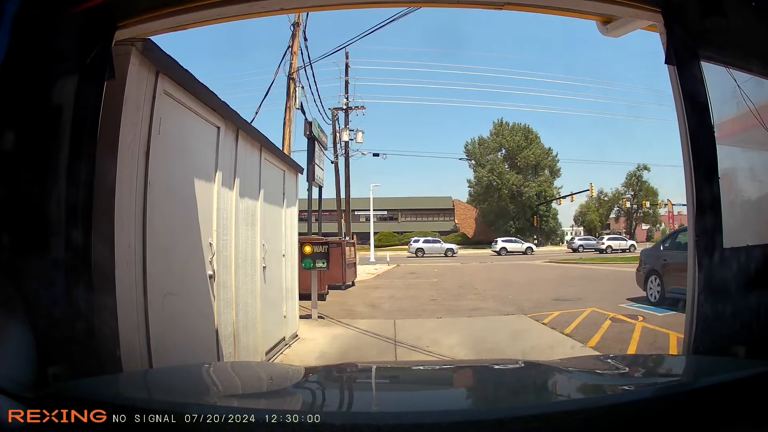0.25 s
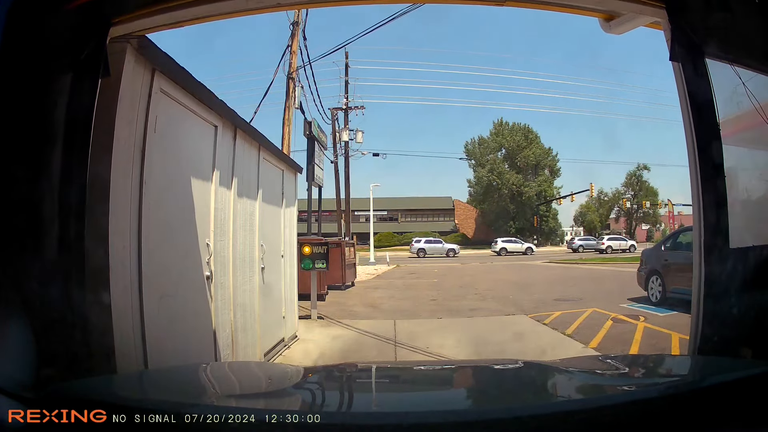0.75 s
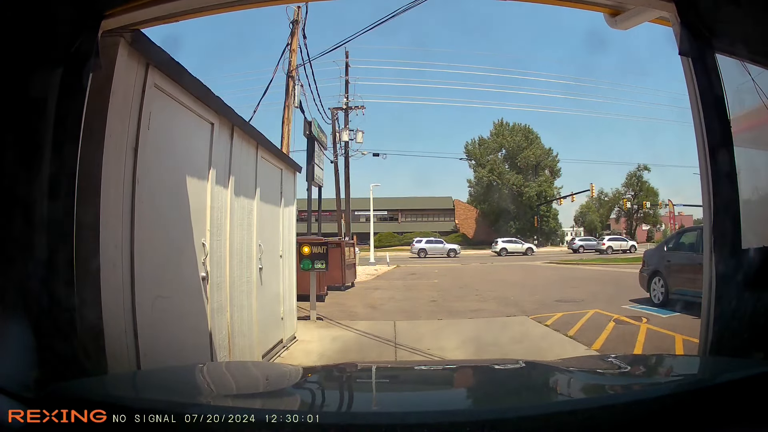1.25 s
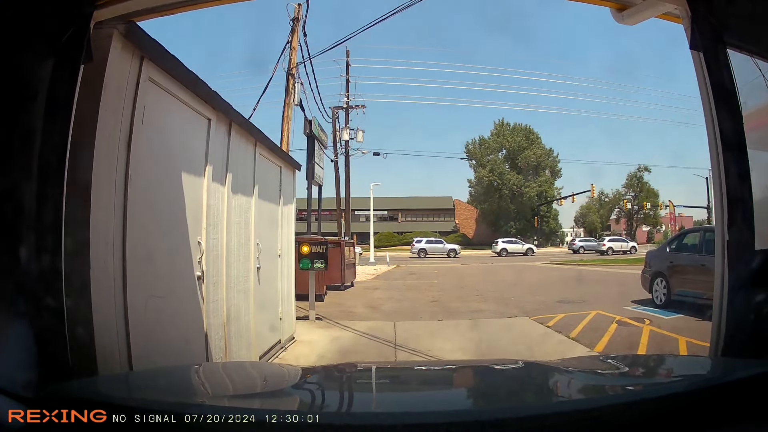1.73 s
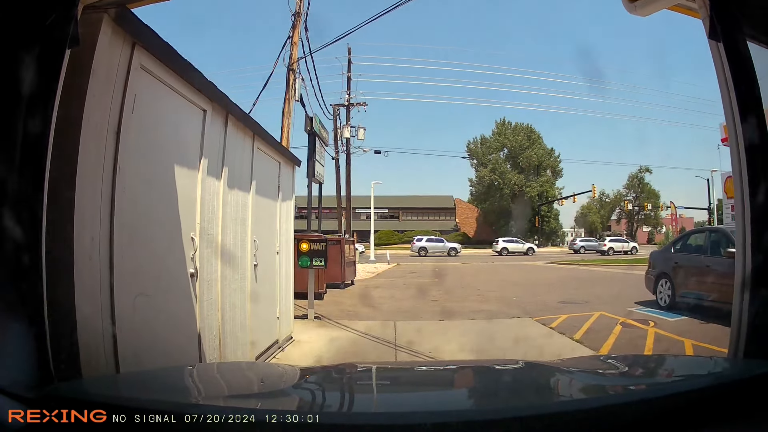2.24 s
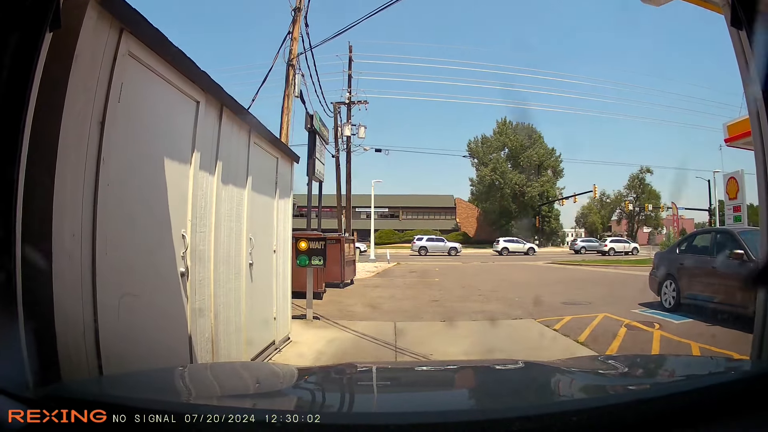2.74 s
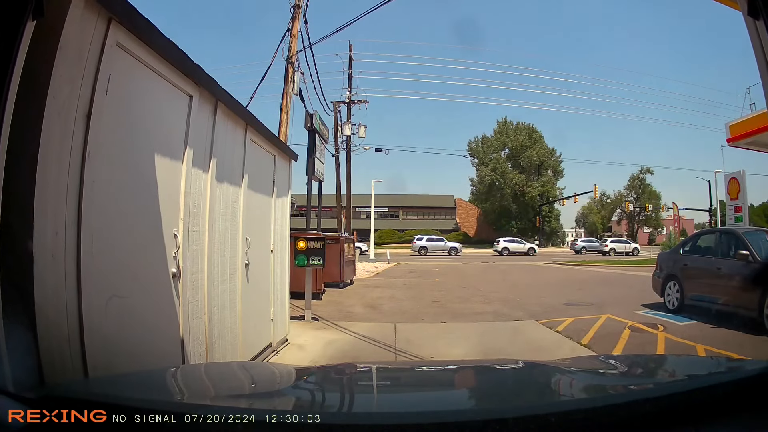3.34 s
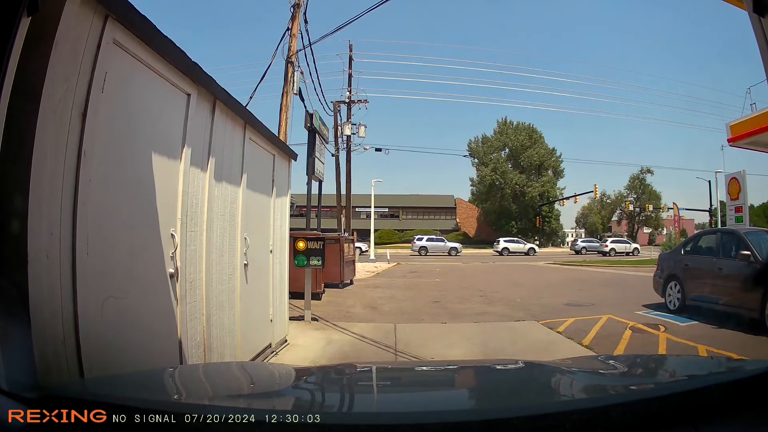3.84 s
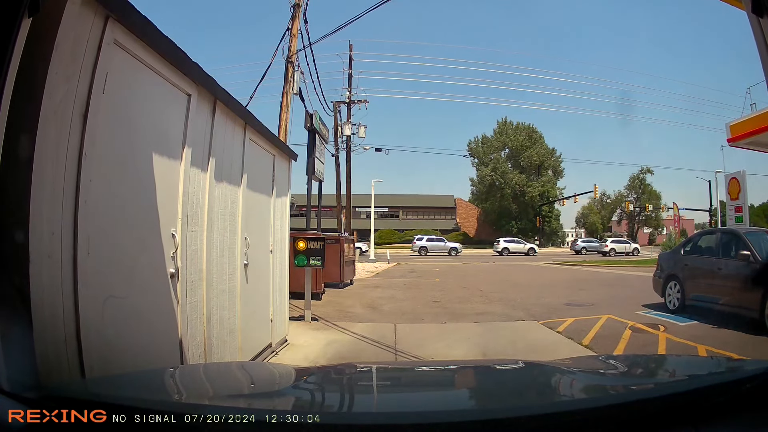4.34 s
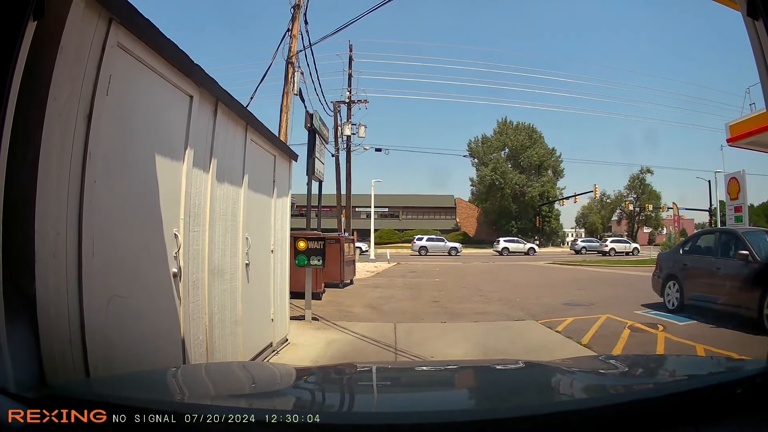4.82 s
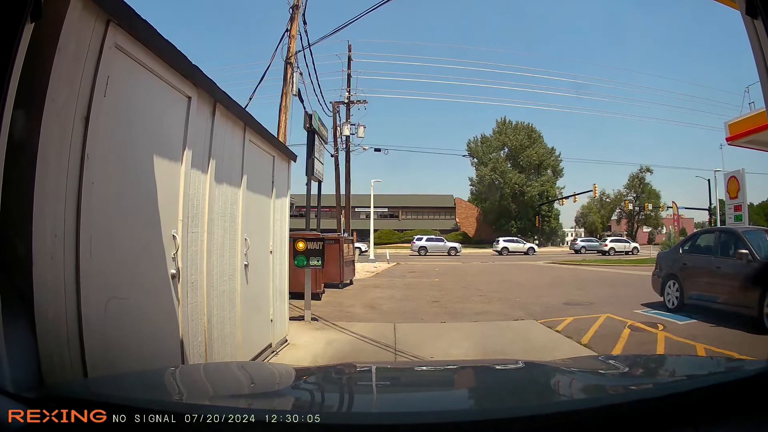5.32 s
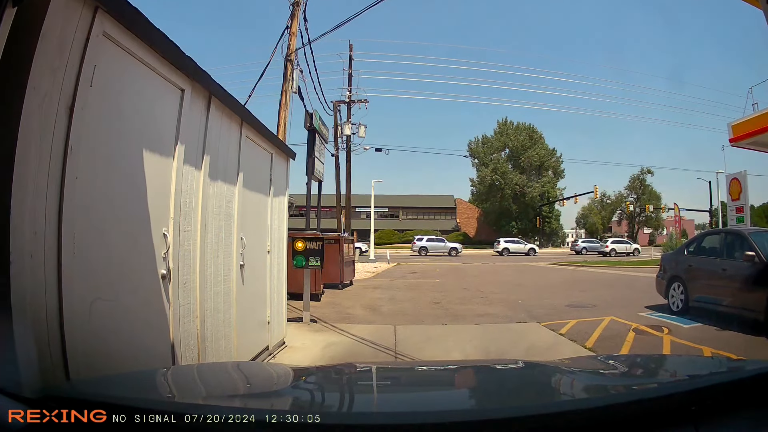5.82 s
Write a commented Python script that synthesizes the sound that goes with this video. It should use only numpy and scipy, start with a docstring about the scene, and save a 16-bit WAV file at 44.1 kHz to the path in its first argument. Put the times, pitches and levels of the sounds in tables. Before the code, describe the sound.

A car rolls slowly out of a car wash under loud air dryers. Inside the closed cabin, a dense low roar and broad hiss fill everything, with irregular thuds of wind. Faint howls come early, brief swishes and droplets near the middle, then a soft sizzle of spray. The buffeting and hiss ease slightly as the roof keeps humming and booming.

```python
"""Under the blowers of a car wash

A car creeps out under the dryer blowers, heard from a small two-port microphone behind the windscreen.
Shaped noise makes the buffeting of the glass, the boom of the cabin, and a roar whose hiss slowly dulls.
A noise band of wandering pitch makes the drone; the fans add a sine whine and narrow noise bands.
Faint howls, brief swishes and sizzling spray are noise that swells and fades; spurts are ringing clicks."""
import sys
import numpy as np
from scipy import signal
from scipy.fft import rfft, irfft
from scipy.io import wavfile
from scipy.ndimage import uniform_filter1d, minimum_filter1d, map_coordinates

SR = 44100
rng = np.random.default_rng(int(sys.argv[2]) if len(sys.argv) > 2 else 0)


def wav_out(sig):
    """Save sig, one row per channel (or a flat mono array), as 16-bit PCM at SR to the path in sys.argv[1]."""
    wavfile.write(sys.argv[1], SR, np.round(np.clip(np.atleast_2d(sig).T, -1, 1) * 32767).astype(np.int16))


N = 267676
TIME = np.arange(N) / SR
FREQ = np.maximum(np.fft.rfftfreq(N, 1 / SR), 1)  # Hz; at least 1, so that its logarithm exists

# Relative strength of the glass buffeting at each pitch: pitch_hz, level_db
BUFFET_SPECTRUM = [(12, -35.5), (25, -13), (40, -2.5), (60, 2.5), (80, 2.5), (110, 8), (135, 2.5),
                   (170, -18.5), (300, -70)]
# Relative strength of the low and middle rush of air: pitch_hz, level_db
ROAR_SPECTRUM = [(130, -25), (220, 5), (290, -0.05), (370, -0.7), (460, -1.7), (550, -8), (630, -8),
                 (695, -10.5), (780, -9), (860, -11.5), (950, -15.5), (1100, -13.5), (1250, -20),
                 (1800, -25.5), (3500, -72)]
# Relative strength of the high rush of air: pitch_hz, level_db
HISS_SPECTRUM = [(700, -7), (1150, 1), (1380, 2), (1540, 4), (1690, -0.5), (1790, 0), (2100, 0.5),
                 (2300, 0), (2460, 1.1), (2850, -2.04), (4000, -4.5), (5000, -9.5), (6200, -16.5),
                 (8000, -24.5), (11000, -41), (14000, -51)]
# Relative strength of the spray's sizzle: pitch_hz, level_db
SPRAY_SPECTRUM = [(4000, -27), (7000, -2.5), (10000, 1), (11800, 0), (13000, -6), (14500, -17.5)]
# Resonances of the cabin air and the roof: pitch_hz, width_hz, relative level_db
CABIN_RESONANCES = [(126.6, 13, 0), (140, 12, -1), (160, 14.5, -0.5), (178.4, 23, 1.5), (197, 25, -13),
                    (344, 28, -16.5), (376, 11.7, -16)]
# Blade tones of the fans, smeared by moving air, with their harmonics: pitch_hz, width_hz, relative level_db
BLADE_TONES = [(586, 4.2, -0.5), (614, 13, -2), (1177, 4.9, -10.5), (1760, 4, -9.5), (1960, 3.2, -11)]
# Howls of fixed pitch: peak_s, length_s, pitch_hz, width_hz, level_db
HOWL_EVENTS = [(0.098, 0.54, 1156, 140, -39.5), (1.2, 0.92, 380, 3.9, -37.5), (1.257, 0.97, 432, 14, -32.5)]
# Brief swishes: peak_s, length_s, pitch_hz, width_hz, level_db (before the rasp)
SWISH_EVENTS = [(2.78, .09, 5750, 600, -58), (2.832, .025, 4400, 800, -47),
                (2.849, 0.034, 3470, 480, -32.5), (3.047, 0.063, 1450, 1000, -35.5),
                (3.22, 0.095, 1980, 720, -37.5)]
# How alike the two sides sound at each pitch; above about 6.2 kHz the two sides are almost identical: pitch_hz,
# # correlation (no unit, -1 to 1)
SIDE_LIKENESS = [(60, 0.99), (160, 1), (270, 0.91), (480, 0.87), (700, 0.39), (860, 0.68), (1050, .08),
                 (1300, 0.021), (1550, 0.0026), (1900, 0.0079), (2400, -0.55), (3400, -0.47), (4800, -0.69),
                 (6050, -0.63), (6350, 1), (11500, 0.73), (13000, 0.1)]
# Path of the cabin's drone, strongest once the jets are on the roof: time_s, pitch_hz, level_db
DRONE_PATH = [(0, 127.4, -23), (.6, 130, -18), (.75, 140.1, -25), (2.4, 135.1, -32), (2.76, 138.2, -16.5),
              (2.9, 177.9, -22), (3.23, 174, -17.5), (3.319, 152.9, -16), (3.43, 146.6, -17),
              (3.702, 147.5, -23.5), (3.902, 167.3, -13), (4.15, 171.8, -22.5), (4.3, 168, -15.5),
              (4.5, 166.1, -20.5), (4.68, 157.6, -13.5), (5.05, 143.6, -18), (5.219, 152.4, -19.5),
              (5.64, 168.1, -16), (5.801, 159.6, -18), (6.07, 142.9, -11.5)]
# Level of the hiss, falling in small steps, some just after loud booms: time_s, level_db
HISS_PATH = [(0, -33.5), (1.1, -34.5), (1.8, -34.5), (2.15, -34.5), (2.7, -34), (3.2, -35.5), (3.38, -37.4),
             (3.8, -36.5), (3.95, -38), (4.55, -37), (4.72, -38.5), (5.42, -37.5), (5.62, -39), (6.07, -39)]
# Brief changes in level, mostly rises; a negative lift is a dip:
# peak_s, length_s, buffeting_lift_db, boom_lift_db
LIFT_EVENTS = [(0.638, 0.04, 8, 2), (0.862, .05, -3, 4.5), (1.269, 0.048, 8, -2), (1.465, .035, 5, 4.5),
               (1.67, 0.063, 5.5, 1.5), (1.821, 0.034, 1, 7.5), (2.243, 0.12, 5, 2.5), (2.51, 0.06, 8, -4),
               (2.64, 0.051, 6, 1.5), (2.766, 0.0092, 11, 4), (2.904, 0.02, 4, 9), (3.13, 0.092, 4, 0),
               (3.221, 0.025, 5, 2), (3.917, 0.14, 2, 3), (4.114, 0.071, 6, -5.5), (4.412, 0.019, -3, 8.5),
               (4.482, 0.029, 10, -3), (4.65, 0.15, 4.5, 0), (5.565, 0.04, -1, 8.5), (5.74, 0.041, 11, -8),
               (5.988, 0.077, 8, 2.5)]
# Brief changes in level, mostly dips; a negative depth is a rise:
# middle_s, buffeting_depth_db, cabin_depth_db
DIP_EVENTS = [(.71, 2, 14), (1.04, 3, 8), (1.53, 3, 5), (1.9, 2, 10), (3.31, 5, 4), (4.811, 6, 3.5),
              (5.239, 4, 5.5), (5.44, -2, 9), (5.75, 0, 5)]
# Showers of spray blown off the roof: peak_s, length_s, level_db (before the patter)
SHOWER_EVENTS = [(3.75, 0.74, -62), (5.151, 0.52, -68)]
# Whine of the clearest fan as the car rolls on: time_s, level_db
WHINE_PATH = [(0, -32.5), (.38, -40.5), (.7, -32.7), (1.25, -41), (1.5, -40), (2.15, -42), (2.45, -37.5),
              (3.5, -40.5), (4.5, -38.5), (4.9, -45), (5.28, -46), (5.53, -36), (5.8, -46), (6.07, -46.5)]
# Spurts of water shaken off the top of the windscreen:
# peak_s, length_s, pitch_ratio (multiplies the ring's pitches), level_db
SPURT_EVENTS = [(3.003, .012, 1.1, -52), (3.028, .017, 1.03, -49.5), (3.06, .03, 1.01, -50),
                (3.103, .008, 0.83, -53), (3.194, .026, 1.13, -48), (3.244, .012, 1.1, -52),
                (3.22, 0.16, 1, -55)]
# What the drops of a spurt ring with: pitch_hz, width_hz, relative level_db
DROP_RESONANCES = [(6400, 1300, -9), (8670, 260, 2), (9940, 470, -3), (10600, 1500, -11)]

# buffeting: level at the start, and its fall as the car rolls on
BUFFET_DB, BUFFET_FALL_DB_PER_S = -17, 1.82
# boom: level with the jets on the glass, then on the roof, which the wide jets reach gradually
BOOM_GLASS_DB, BOOM_ROOF_DB, ROOF_S, ROOF_LENGTH_S = -20, -17, 1.7, 0.9
DRONE_WIDTH_HZ = 8.6
# roar: level at the start and fall with distance, plus a swell while the nozzles are nearest
ROAR_DB, ROAR_FALL_DB_PER_S = -23, 0.37
NEAREST_S, NEAREST_LENGTH_S, ROAR_LIFT_DB = 2.6, 0.91, 2
DIP_S = 0.027
# thinning mist on the glass: level at the start and its fall
MIST_DB, MIST_FALL_DB_PER_S = -57, 2
# clearest fan: middle pitch and typical drift; level of the smeared blade tones against its whine
WHINE_HZ, WHINE_DRIFT_HZ, BLADES_DB = 590, 2.48, -0.5
DROPS_PER_S, DROP_SPREAD_DB = 650, 0.5
TOP_HZ = 13300  # little sounds above this pitch


def undb(db):
    """Turn decibels into a gain that multiplies the sound."""
    return 10 ** (np.asarray(db) / 20)


def over_frequency(points):
    """Join points by straight lines on a log-frequency axis."""
    hz, value = np.transpose(points)
    return np.interp(np.log(FREQ), np.log(hz), value)


def over_time(points):
    """Join points by straight lines along time."""
    return np.interp(TIME, *np.transpose(points))


def resonances(modes):
    """Gain of steep-sided resonances side by side, with their powers added."""
    power = 0
    for hz, width, db in modes:
        offset = (FREQ - hz) / width * 2
        power = power + (undb(db) / (1 + offset ** 2 / 2)) ** 2
    return np.sqrt(power)


def walk(rate):
    """Smooth random curve that changes about rate times a second; its typical spread is 1."""
    curve = irfft(rfft(rng.standard_normal(N)) * np.exp(-(FREQ / rate) ** 2), N)
    return curve / curve.std()


def turbulence(gain):
    """Noise shaped by a gain over frequency, on two sides as alike as the likeness table says; average (rms)
    level 1."""
    alike = np.clip(over_frequency(SIDE_LIKENESS), -1, 1)
    # a shared part and an opposite part, mixed to make the two sides as alike as the table says
    mid, side = rfft(rng.standard_normal((2, N))) * gain * np.sqrt([1 + alike, 1 - alike])
    noise = irfft(np.array([mid + side, mid - side]), N)
    return noise / noise.std()


def driven(noise, db, span_s):
    """Give a noise the level db, leaving only its flutter faster than about span_s."""
    size = int(span_s * SR)
    power = np.mean(noise ** 2, axis=0)
    smooth_power = uniform_filter1d(uniform_filter1d(power, size), size)
    return noise / np.sqrt(smooth_power) * undb(db)


def swell(at, length):
    """A smooth rise to 1 at a given time, and back to 0."""
    return np.exp(-2 * ((TIME - at) / length) ** 2)


def passed(at, length):
    """A smooth step from 0 to 1 around a given time."""
    return .5 + .5 * np.tanh((TIME - at) / length)


def swelling_bands(events):
    """Bands of noise, each swelling and fading around its own pitch."""
    bands = 0
    for at, length, hz, width, db in events:
        noise = turbulence(resonances([(hz, width, 0)]))
        bands = bands + undb(db) * swell(at, length) * noise
    return bands


def bent(sound, ratio):
    """Bend pitch by reading the sound faster or slower; ratio is the reading speed."""
    place = np.cumsum(ratio)
    return np.array([map_coordinates(side, [place], mode="mirror") for side in sound])


def brief_lifts():
    """Brief rises, and some dips, in the level of the buffeting and the boom, in dB; one row for each."""
    return sum(np.outer([glass_db, roof_db], swell(at, length))
               for at, length, glass_db, roof_db in LIFT_EVENTS)


def brief_dips():
    """Brief dips as dB to take off the buffeting and the cabin sound; one row for each."""
    return sum(np.outer([glass_db, cabin_db], swell(at, DIP_S))
               for at, glass_db, cabin_db in DIP_EVENTS)


def buffeting(change_db, lump_db=1.8):
    """Large eddies beat on the windscreen in uneven lumps, less as the jets move up and away."""
    db = BUFFET_DB - BUFFET_FALL_DB_PER_S * TIME + change_db + lump_db * walk(25)
    noise = turbulence(undb(over_frequency(BUFFET_SPECTRUM)))
    return driven(noise, db, span_s=0.17)


def boom(change_db):
    """The jets drum on the roof and ring the air of the cabin."""
    roof_lift_db = (BOOM_ROOF_DB - BOOM_GLASS_DB) * passed(ROOF_S, ROOF_LENGTH_S)
    db = BOOM_GLASS_DB + roof_lift_db + change_db
    return driven(turbulence(resonances(CABIN_RESONANCES)), db, span_s=0.083)


def drone():
    """The air stream over the roof pumps the cabin at one narrow, wandering pitch."""
    at, hz, db = np.transpose(DRONE_PATH)
    centre = np.mean(hz)
    hum = turbulence(resonances([(centre, DRONE_WIDTH_HZ, 0)]))
    wandering = bent(hum, np.interp(TIME, at, hz) / centre)
    return driven(wandering, np.interp(TIME, at, db), span_s=0.056)


def rush(roar_flutter_db=0.79, hiss_flutter_db=0.49):
    """The nozzles' turbulent air roars and hisses through the glass; the middle range leans right."""
    nearest_db = ROAR_LIFT_DB * swell(NEAREST_S, NEAREST_LENGTH_S)
    roar_db = ROAR_DB - ROAR_FALL_DB_PER_S * TIME + nearest_db + roar_flutter_db * walk(6.4)
    hiss_db = over_time(HISS_PATH) + hiss_flutter_db * walk(32)
    roar = turbulence(undb(over_frequency(ROAR_SPECTRUM))) * undb(roar_db)
    hiss = turbulence(undb(over_frequency(HISS_SPECTRUM))) * undb(hiss_db)
    # pitch_hz, left minus right in dB
    lean_db = over_frequency([(250, 0), (700, -1.1), (1200, -1.6), (2300, -0.7), (7000, 0.036)])
    return irfft(rfft(roar + hiss) * undb(np.array([lean_db, -lean_db]) / 2), N)


def fans(waver_db=1.5):
    """One fan holds a thin, wavering whine; moving air smears the fans' blade tones and harmonics."""
    db = over_time(WHINE_PATH)
    pitch_hz = WHINE_HZ + WHINE_DRIFT_HZ * walk(3.5)
    phase = 2 * np.pi * np.cumsum(pitch_hz) / SR
    # the root of 2 gives the sine an average (rms) level of 1
    whine = np.sqrt(2) * np.sin(phase) * undb(db + waver_db * walk(5.6))
    blades = driven(turbulence(resonances(BLADE_TONES)), db + BLADES_DB, span_s=0.15)
    return whine + blades


def spray():
    """Mist and showers blown over the glass make a fine, uneven sizzle."""
    mist = undb(MIST_DB - MIST_FALL_DB_PER_S * TIME)
    showers = sum(undb(db) * swell(at, length) for at, length, db in SHOWER_EVENTS)
    patter_db = 1.8 * walk(300) + 1.3 * walk(15)
    sizzle = turbulence(undb(over_frequency(SPRAY_SPECTRUM)))
    return sizzle * (mist + showers) * undb(patter_db)


def howls():
    """The jets excite faint howls of fixed pitch while they play on the front of the car."""
    return swelling_bands(HOWL_EVENTS)


def swishes(rasp_db=2):
    """Air catches an edge for a moment: a ragged band of noise swells and fades."""
    return swelling_bands(SWISH_EVENTS) * undb(rasp_db * walk(150))


def drops():
    """Small drops fizz on the glass: clicks of random strength ring at each spurt's own pitch."""
    out = 0
    for at, length, pitch, db in SPURT_EVENTS:
        lands = rng.random((2, N)) < DROPS_PER_S / SR
        strength = undb(DROP_SPREAD_DB * np.minimum(rng.exponential(size=(2, N)), 4))
        ticks = lands * strength
        both_ports = ticks + .5 * ticks[::-1]  # each port also hears the other's drops at half strength
        ring = resonances([(hz * pitch, width, mode_db) for hz, width, mode_db in DROP_RESONANCES])
        fizz = irfft(rfft(both_ports) * ring * (FREQ > 1000), N)  # nothing below 1000 Hz
        out = out + fizz / fizz.std() * undb(db) * swell(at, length)
    return out


def scene():
    """Air, fans and water add together in the cabin, with brief dips shared by boom and drone."""
    dip_db = brief_dips()
    glass_db, roof_db = brief_lifts() - dip_db
    cabin = boom(roof_db) + drone() * undb(-dip_db[1])
    air = buffeting(glass_db) + cabin + rush()
    return air + fans() + spray() + howls() + swishes() + drops()


def record(dry, ceiling_db=-3):
    """The gain eases down around the largest peaks, and a filter cuts the top treble."""
    size = int(.012 * SR)  # 12 ms of easing
    allowed = np.minimum(1, undb(ceiling_db) / (np.abs(dry).max(axis=0) + 1e-9))
    gain = uniform_filter1d(minimum_filter1d(allowed, size), size)
    fade = np.clip(np.minimum(TIME, TIME[-1] - TIME) / .004, 0, 1)  # 4 ms at each end
    top_cut = signal.ellip(8, .2, 70, TOP_HZ, fs=SR, output="sos")
    return signal.sosfilt(top_cut, dry * gain * fade)


dry = scene()
out = record(dry)
wav_out(out)
```